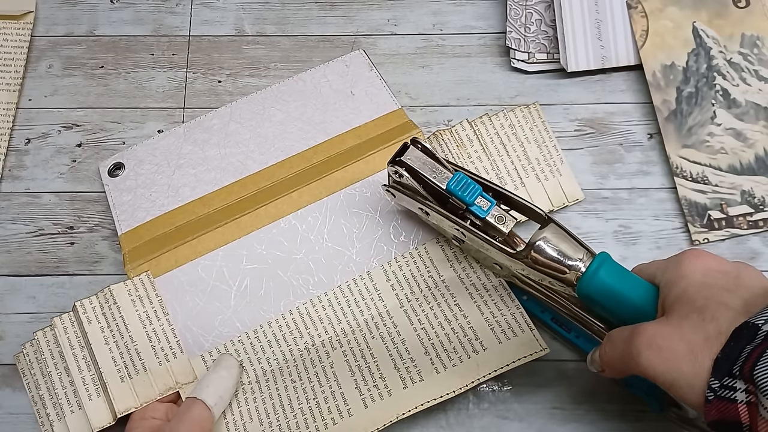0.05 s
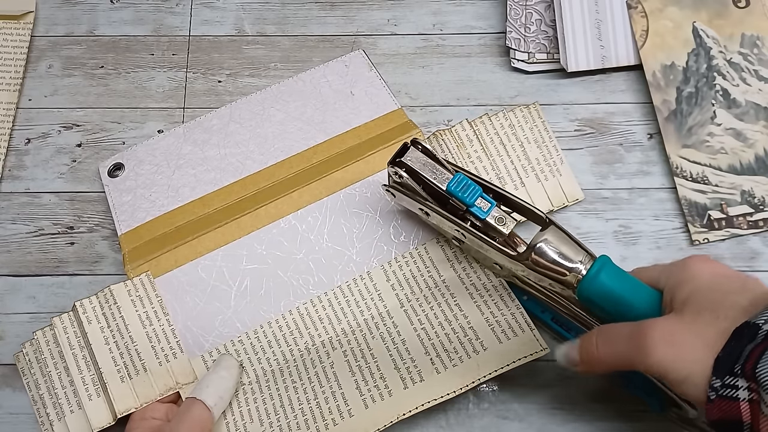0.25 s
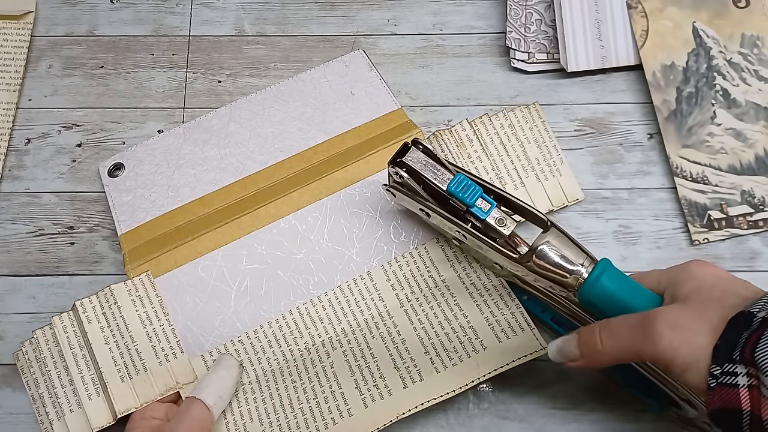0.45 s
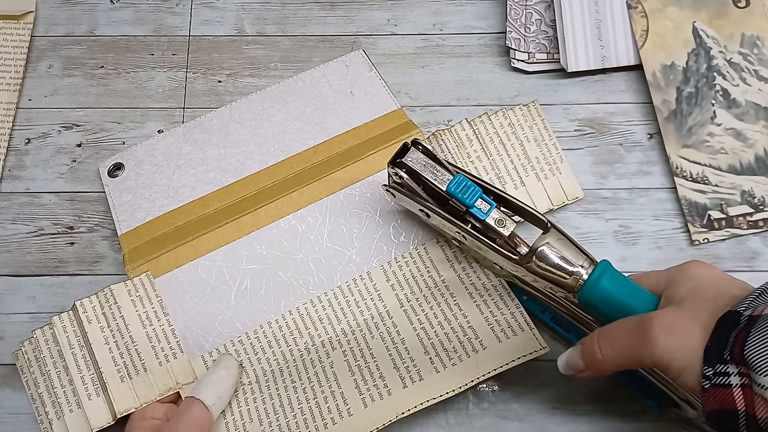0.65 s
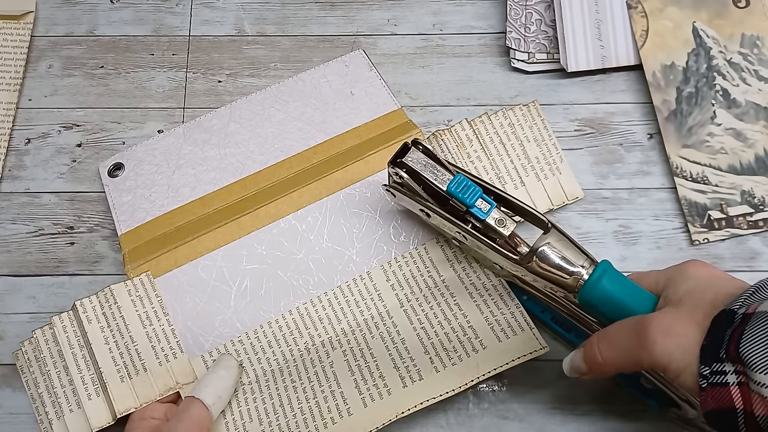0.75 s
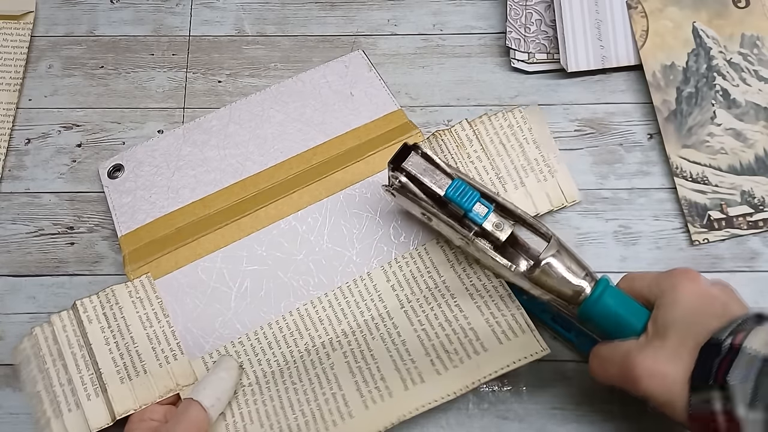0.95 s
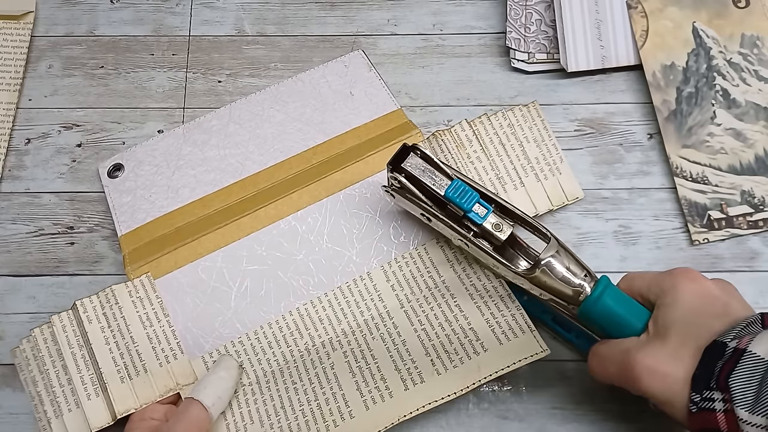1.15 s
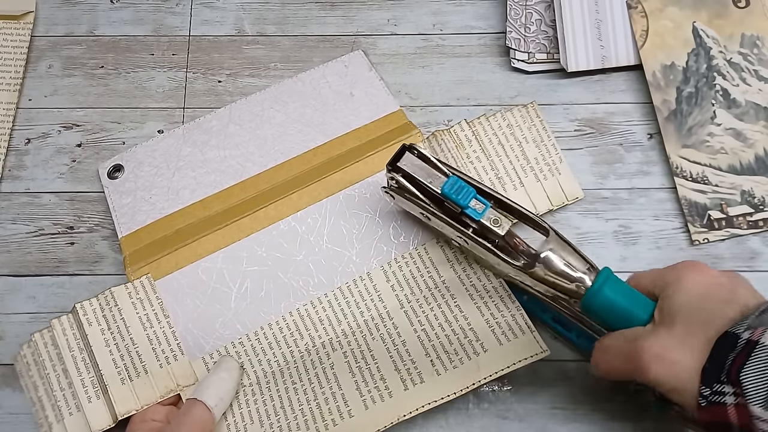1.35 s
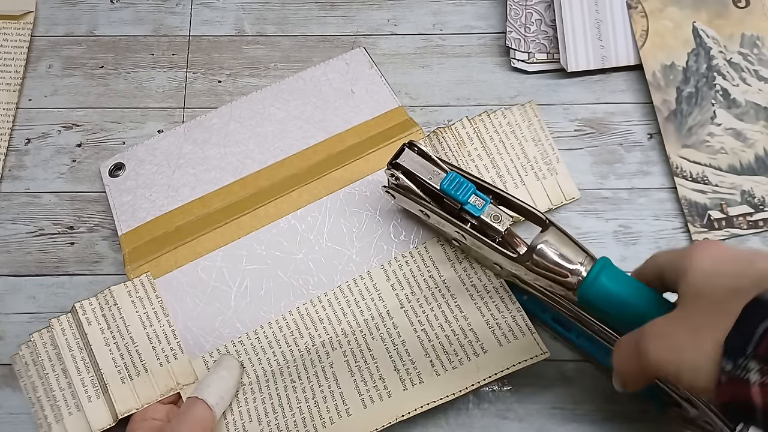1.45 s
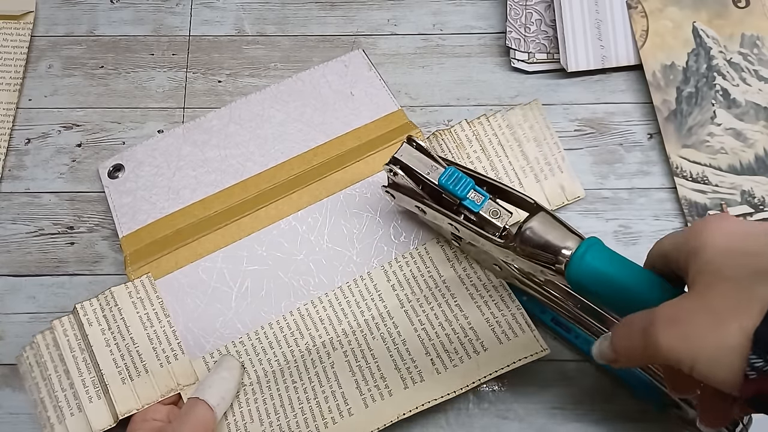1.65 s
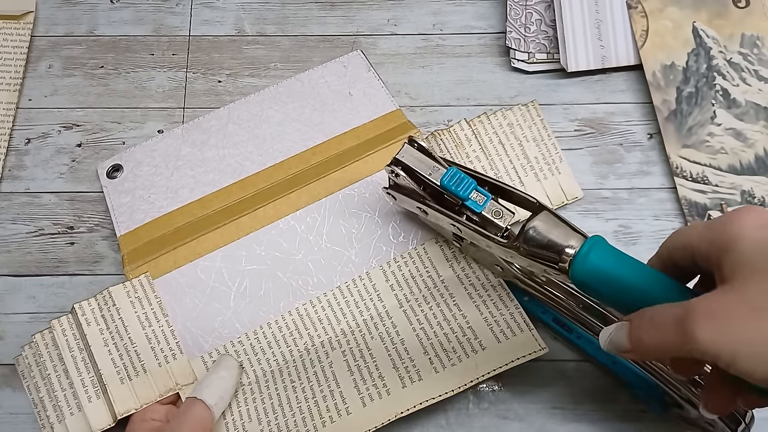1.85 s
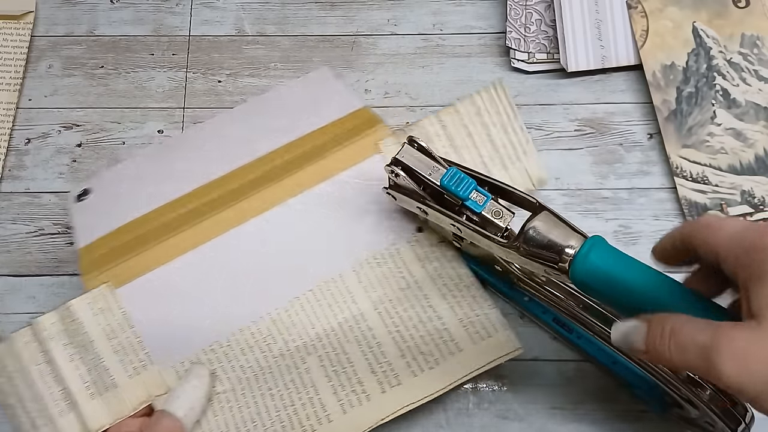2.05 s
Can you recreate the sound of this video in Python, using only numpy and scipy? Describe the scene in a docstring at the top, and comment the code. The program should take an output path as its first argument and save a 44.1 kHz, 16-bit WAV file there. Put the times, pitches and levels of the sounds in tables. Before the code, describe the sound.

Close up in a small quiet room, a hand punch creaks through stiff card in three pushes, snaps hard against the desk, then its lever scrapes and clacks back, with a few last knocks and a slide.

```python
"""A steel hand punch is squeezed through a card cover, close to the microphones, over a desk in a small room.
The hand rubs on the grips and the card creaks by stick-slip in three pushes, the last ever faster.
The pin snaps through, thumping the modes of desk and frame; the desk shudders and the spring sings on.
The pin scrapes back out as band noise, the lever clacks and squeaks at a gliding pitch with its partials,
and after some last knocks the punch slides off the card; a diffuse room tail and faint air noise lie under all."""
import sys
import numpy as np
from scipy import signal
from scipy.fft import rfft, irfft
from scipy.io import wavfile
from scipy.ndimage import uniform_filter1d

SR = 44100
rng = np.random.default_rng(int(sys.argv[2]) if len(sys.argv) > 2 else 0)


def waveform_to_disk(signal):
    """Save audio, clipped to [-1, 1], as 16-bit WAV at the path in sys.argv[1]."""
    frames = np.transpose(np.atleast_2d(signal))
    scaled = np.clip(frames, -1, 1) * 32767
    samples = np.round(scaled).astype(np.int16)
    wavfile.write(sys.argv[1], SR, samples)


N = 92521

# stereo width of noise, side minus mid: (frequency [Hz], level [dB])
WIDTH = [(60, -8.5), (300, -13.5), (700, -4.5), (1400, 2), (16000, -1)]


def amp(db):
    """Level law: 20 dB is a factor of ten in amplitude."""
    return 10 ** (np.asarray(db) / 20)


def seconds():
    """Sampled time axis of the scene [s]."""
    return np.arange(N) / SR


def decay(t, t60):
    """Exponential decay law: the level falls 60 dB in t60 seconds."""
    return np.exp(-np.log(1000) * t / t60)


def level_curve(points):
    """Amplitude over time, linear in level between (time [s], level [dB]) points."""
    when, db = np.array(points).T
    return amp(np.interp(seconds(), when, db))


def gains(points, size=N):
    """Frequency response: gain of each bin from (frequency [Hz], level [dB]) points on a log axis."""
    hz, db = np.array(points, float).T
    bins_hz = np.arange(size // 2 + 1) * SR / size
    return amp(np.interp(np.log(bins_hz + 1), np.log(hz), db))


def colour(x, points):
    """Linear filtering: multiply the spectrum by a frequency response."""
    return irfft(rfft(x) * gains(points), N)


def noise(points):
    """Random noise of a given spectrum and rms 1, its stereo width set by the mid and side balance."""
    mid, side = rng.standard_normal((2, N))
    side = colour(side, WIDTH)
    x = colour([mid + side, mid - side], points)
    return x / x.std()


def unit(h):
    """Energy normalisation: a response gets the energy of 10 ms at rms 1."""
    energy = np.mean(np.sum(h ** 2, axis=-1))
    return h / np.sqrt(energy / (SR / 100))


def through(x, h):
    """Convolution: every input sample sets off a copy of the response."""
    return signal.fftconvolve(np.atleast_2d(x), np.atleast_2d(h), axes=-1)[:, :N]


def ring(modes):
    """Modal superposition: damped modes swell within a cycle, with more phase between sides in higher ones."""
    t, out = seconds()[:SR], 0
    for k, (hz, db, t60) in enumerate(modes):
        sign = (-1) ** k
        skew = sign * min(hz / 3000, .9) * np.array([[1], [-1]])
        swell = 1 - np.exp(-2 * t * hz)
        out = out + sign * amp(db) * swell * decay(t, t60) * np.cos(2 * np.pi * hz * t + skew)
    return unit(out)


def burst(points, fade):
    """High modal density: many modes merge into fading stereo noise, evened out to the given colour."""
    size = len(fade)
    parts = rfft(rng.standard_normal((2, size)) * fade)
    even_bins = int(250 * size / SR)  # power averaged over 250 Hz
    power = uniform_filter1d(np.abs(parts) ** 2, even_bins, axis=-1)
    mid, side = parts / np.sqrt(power) * gains(points, size=size)
    side = side * gains(WIDTH, size=size)
    first_half = np.arange(size) < size / 2
    return unit(irfft([mid + side, mid - side], size) * first_half)


def grain(rate, depth_db):
    """Random modulation: level drawn anew rate times a second, as in the uneven grip of surfaces."""
    knots = np.arange(0, N / SR + 1, 1 / rate)
    return amp(depth_db * np.interp(seconds(), knots, rng.standard_normal(len(knots))))


def stick_slip(push):
    """Stick-slip: a train of impulses at the rate of the push, with jitter, scatter and changing treble."""
    jitter, scatter_db, treble_hz = .04, 2.5, 2400
    when, rate, db, treble = np.array(push).T
    slips, at = np.zeros(N), when[0]
    taps = np.arange(-8, 9)
    for late, size in rng.standard_normal((200, 2)):
        if at > when[-1]:
            break
        # windowed sinc places the slip between samples
        pulse = np.sinc(taps - at * SR % 1) * np.hanning(len(taps))
        slips[int(at * SR) + taps] += amp(np.interp(at, when, db) + scatter_db * size) * pulse
        at += np.exp(jitter * late) / np.interp(at, when, rate)
    low = signal.sosfiltfilt(signal.butter(2, treble_hz, fs=SR, output="sos"), slips)
    return low + (slips - low) * amp(np.interp(seconds(), when, treble))


def creak():
    """Stick-slip excitation of a resonator: each slip of the three pushes briefly rings the card."""
    # slips of the squeezed card: (time [s], slip rate [1/s], level [dB], treble gain [dB])
    first_push = [(.343, 70.4, -55, -51.5), (.353, 77.6, -50, -17.5), (.378, 113, -50.5, -19),
                  (.405, 131, -44, -18), (.443, 175, -48.5, -10), (.455, 100, -42, -9),
                  (.466, 70, -40.5, -7), (.485, 60, -43.5, -8)]
    middle_push = [(.498, 87.9, -44, -6.5), (.525, 91.2, -44.5, -2), (0.559, 102.1, -40, 6.5),
                   (0.589, 85.8, -42.5, -1.5)]
    last_push = [(.614, 70.4, -42, 4.5), (0.659, 89.4, -42.5, 0), (0.693, 113.2, -38.5, 3.5),
                 (0.726, 177.5, -38.5, 6), (0.746, 246.8, -37, 0), (0.764, 405.7, -38, 6.5),
                 (0.777, 558, -45.5, 11.5), (.79, 853, -37.5, 1.5)]
    # spectrum of the card's ring: (frequency [Hz], level [dB])
    card = [(60, -28.5), (130, -16.5), (235, 9.5), (330, -6.5), (420, 11.5), (600, -11), (830, 3),
            (1100, -12.5), (1450, -7), (1900, -23.5), (2700, -17.5), (3400, -37.5), (6300, -27),
            (7700, -29.5), (9300, -26), (12000, -34.5), (16000, -52)]
    ring_s, tail_s, tail_db = 0.0071, 0.0085, -14.5
    t = seconds()[:SR // 2]
    slips = sum(stick_slip(push) for push in (first_push, middle_push, last_push))
    fade = np.exp(-t / ring_s) + amp(tail_db) * np.exp(-t / tail_s)
    return through(slips, burst(card, fade))


def blows():
    """Impact excitation: each blow rings desk, frame and pin, with a dull clack and a bright tick of contact."""
    # blows: (time [s], desk [dB], frame [dB], clack [dB], tick [dB], pin [dB], left minus right [dB])
    blow_table = [(.789, -21, -54, -32.5, -55, -63, -3), (.801, -62, -49, -63, -34, -51.5, -3),
                  (.8172, -10.5, -40, -23.5, -22, -41.5, 2.5), (.8205, -17.5, -30, -18, -17.5, -51.5, -1),
                  (.8275, -14.5, -38, -36.5, -27.5, -34.5, -3), (.8352, -14.5, -30.5, -34, -24.5, -51.5, 0),
                  (1.268, -55, -59, -43, -67, -76.5, -5), (1.2858, -45.5, -38, -33, -29, -38, 0.5),
                  (1.308, -53, -61, -31.5, -54, -62.5, -10.5), (1.3162, -41, -22, -34.5, -21, -23.5, -1),
                  (1.342, -38.5, -44, -30.5, -28.5, -56, -1.5), (1.351, -42, -37, -67, -37.5, -48, 2.5),
                  (1.363, -69, -50, -36.5, -49, -50, -1.5), (1.5598, -45, -59.5, -40.5, -22.5, -49, 1),
                  (1.570, -56, -32.5, -38, -58.5, -72, 0.5), (1.5825, -44, -40, -40.5, -61, -59.5, -3),
                  (1.623, -51.5, -45.5, -59, -70, -71, -0.5), (1.640, -68, -66, -65.5, -82, -84, 0),
                  (1.7722, -28, -29, -25, -52, -68, -0.5), (1.7775, -35.5, -36, -39, -68, -71, 5.5),
                  (2.068, -70.5, -28.5, -54, -52.5, -65, -0.5)]
    # modes of each body: (frequency [Hz], level [dB], t60 [s])
    desk_modes = [(86, -15.5, 0.067), (124.9, 1.5, .16), (171.1, -16.5, 0.027), (227.5, 5.5, 0.066),
                  (316, -1, 0.058), (345, -1, 0.069), (424, 1, 0.082), (526, -16.5, 0.12)]
    frame_modes = [(434.1, -18.5, 0.27), (721, 0.5, .06), (816.5, -2.5, 0.07), (990, 3, 0.01),
                   (1383, -7.5, 0.037), (1610, -10, 0.018)]
    pin_modes = [(2843, -11, .08), (2890, -8, 0.08), (6360, -18, .06), (6750, -2, 0.023),
                 (10950, -0.5, 0.053), (13030, -7.5, .05)]
    # spectra of the contact noise: (frequency [Hz], level [dB])
    clack_colour = [(30, -34), (90, -13.5), (200, 0.5), (420, 11.5), (560, 0), (850, 4.5), (1300, -5.5),
                    (2000, -7.5), (2850, -5.5), (3800, -15), (7000, -17.5), (16000, -38)]
    tick_colour = [(500, -23), (2000, -11.5), (2900, -13.5), (4200, -4), (6800, 4), (8800, -4), (11000, 1),
                   (15500, 1.5)]
    clack_s, tick_s = 0.0075, 0.0036  # decay time constants of the contact noise
    buzz_s, buzz_db = 0.012, -21  # loose parts buzz on as a slower noise tail
    t, out = seconds()[:SR // 2], np.zeros((2, N + SR))
    desk, frame, pin = (ring(modes)[:, :len(t)] for modes in (desk_modes, frame_modes, pin_modes))
    buzz = amp(buzz_db) * np.exp(-t / buzz_s)
    for at, desk_db, frame_db, clack_db, tick_db, pin_db, pan_db in blow_table:
        clack = burst(clack_colour, np.exp(-t / clack_s) + buzz)
        tick = burst(tick_colour, np.exp(-t / tick_s) + buzz)
        hit = amp(desk_db) * desk + amp(frame_db) * frame + amp(pin_db) * pin
        hit = hit + amp(clack_db) * clack + amp(tick_db) * tick
        i = int(at * SR)
        out[:, i:i + len(t)] += hit * amp([[pan_db / 2], [-pan_db / 2]])
    return out[:, :N]


def squeak():
    """Periodic stick-slip of steel on steel: harmonic partials on a gliding, slightly unsteady pitch."""
    # the returning lever: (time [s], pitch [Hz], level [dB])
    glide = [(1.389, 380.4, -64), (1.421, 398.8, -53), (1.434, 429.5, -36), (1.451, 408.4, -37),
             (1.478, 408, -50.5), (1.50, 395, -70.5), (1.53, 410, -110)]
    # harmonics: (multiple of the pitch [-], level [dB])
    partials = [(1, 0), (2, -18), (3, -14), (4, -24), (6, -9), (7, -19), (9, -19), (12, -18), (15, -12),
                (18, -18)]
    t, (when, hz, db) = seconds(), np.array(glide).T
    pitch = np.interp(t, when, hz) * grain(rate=330, depth_db=-0.1)
    phase = 2 * np.pi * np.cumsum(pitch) / SR
    sides = np.array([[1], [-1]])
    tone = sum(amp(level) * np.sin(k * phase + sides * min(k / 6, .7)) for k, level in partials)
    return tone * amp(np.interp(t, when, db)) * (t > when[0]) * (t < when[-1])


def pin_scrapes():
    """Sliding friction: the pin rubs in the hole as grainy noise."""
    # scrapes: (time [s], length [s], level [dB])
    scrapes = [(0.79, 0.041, -41), (1.202, 0.028, -39), (1.246, 0.057, -56.5), (1.313, 0.036, -36),
               (1.36, 0.12, -50.5), (1.47, 0.089, -63.5)]
    # spectrum: (frequency [Hz], level [dB])
    scrape_colour = [(200, -16), (850, 2), (1700, -3.5), (2800, 4), (4200, -5), (6500, 5), (9000, -6),
                     (13000, -1.5), (16000, -8)]
    attack_s, release_s = 0.015, .007
    t, rub = seconds(), 0
    for at, length, db in scrapes:
        attack = np.clip((t - at) / attack_s, 0, 1)
        release = np.exp(-np.maximum(t - at - length, 0) / release_s)
        rub = rub + amp(db) * attack * release
    return rub * noise(scrape_colour) * grain(rate=1300, depth_db=1.5)


def sliding():
    """Sliding friction: the punch moves over the card as grainy noise."""
    # level of the slide: (time [s], level [dB])
    slide_level = [(1.975, -86), (2.0, -61), (2.03, -55.5), (2.056, -40.5), (2.08, -46.5), (2.1, -39)]
    # spectrum: (frequency [Hz], level [dB])
    slide_colour = [(60, -17.5), (300, -15), (520, -13.5), (740, 4.5), (1100, -14), (1550, -5), (2200, -19),
                    (4500, -20.5), (8000, -25), (16000, -30)]
    return level_curve(slide_level) * noise(slide_colour) * grain(rate=750, depth_db=2.0)


def hand_grip():
    """Skin friction: the hand on the grips gives dull noise with a slow, uneven level."""
    # level of the grip: (time [s], level [dB])
    grip_level = [(0, -81), (.05, -87), (.07, -69.5), (.13, -66), (.2, -61), (.25, -64.5), (.29, -74),
                  (.35, -64.5), (.9, -57.5), (1.0, -66.5), (1.08, -93.5), (1.2, -79), (1.25, -52),
                  (1.5, -62.5), (1.62, -54), (1.7, -82.5), (1.97, -78.5), (2.1, -80)]
    # spectrum: (frequency [Hz], level [dB])
    hand_colour = [(30, -8.5), (130, 6), (250, 3), (430, 0), (600, -15.5), (820, -9), (1500, -31),
                   (4000, -39), (16000, -37.5)]
    return level_curve(grip_level) * noise(hand_colour) * grain(rate=30, depth_db=5)


def tinks():
    """Narrow-band resonance: each light touch in the linkage rings in one band and fades exponentially; the
    loud band at 1.772 s adds to the frame's ring near 430 Hz under the clack."""
    # touches, and the clack's frame ring at 1.772 s: (time [s], centre frequency [Hz], level [dB])
    touches = [(0.198, 423, -62), (0.312, 685, -66), (1.284, 2700, -31.5), (1.719, 1087, -66.5),
               (1.772, 433, -26.5), (1.902, 3255, -60.5), (1.947, 3096, -65.5)]
    fade_s = 0.016
    t, out = seconds(), 0
    for at, hz, db in touches:
        band = noise([(hz / 2, -35), (hz / 1.12, -12), (hz, 0), (hz * 1.13, -10), (hz * 2, -20), (hz * 4, -40)])
        out = out + amp(db) * band * (t > at) * np.exp(-np.abs(t - at) / fade_s)
    return out


def spring():
    """Lightly damped oscillator: the snap sets the spring singing until the lever moves again."""
    start, stop = .82, 1.23  # s
    hz, t60 = 893.6, 1.8
    t = seconds()
    free = np.clip(np.minimum(t - start, stop - t) / .01, 0, 1)  # 10 ms fades
    tone = free * decay(t - start, t60) * np.sin(2 * np.pi * hz * t)
    return amp(-61) * tone * amp([[-7], [5]])  # weaker on the left


def shudder():
    """Low-frequency structural vibration: the desk rumbles under the snap."""
    # level of the rumble: (time [s], level [dB])
    rumble_level = [(.78, -79), (.83, -35), (.895, -33), (.96, -55), (1.01, -56.5), (1.08, -82),
                    (1.2, -100)]
    # spectrum: (frequency [Hz], level [dB])
    rumble_colour = [(20, -16), (45, -0.5), (85, 0.5), (110, -11), (170, -13), (400, -25), (700, -53.5),
                     (4000, -82.5)]
    return level_curve(rumble_level) * noise(rumble_colour)


def room(dry):
    """Diffuse reverberation: convolution with exponentially decaying noise that enters after a short delay."""
    # spectrum of the tail: (frequency [Hz], level [dB])
    room_colour = [(40, -1.5), (150, 3.5), (500, 2), (2500, 1.5), (7000, -3), (16000, -4)]
    level_db, t60, delay_s = -14.5, 0.21, .007
    t = seconds()
    onset = np.clip(t / delay_s - 1, 0, 1)
    tail = noise(room_colour) * onset * decay(t, t60)
    tail = tail / np.sqrt(np.sum(tail ** 2) / 2)  # mean energy 1 per side
    return amp(level_db) * through(dry, tail)


def air():
    """Stationary random noise: the faint, steady air of the background."""
    # spectrum: (frequency [Hz], level [dB])
    air_colour = [(25, -13), (80, -1.5), (250, -17), (700, -23.5), (1200, -26), (16000, -33)]
    return amp(-79.5) * noise(air_colour)


def scene():
    """Superposition: the sources add; all but the spring also excite the room."""
    dry = creak() + blows() + squeak() + pin_scrapes() + sliding() + hand_grip() + tinks() + shudder()
    return dry + spring() + room(dry) + air()


def record(dry):
    """Band limiting: two microphones differ a little in colour; the recorder cuts deepest bass and top."""
    # left minus right: (frequency [Hz], level [dB])
    balance = [(100, 1), (800, -1), (2000, 2.1), (5000, -1.5), (14000, 4.2)]
    low_cut_hz, top_hz = 32, 16000
    x = irfft(rfft(dry) * gains(balance) ** np.array([[.5], [-.5]]), N)
    x = signal.sosfilt(signal.butter(2, low_cut_hz, "high", fs=SR, output="sos"), x)
    return signal.sosfilt(signal.ellip(8, .2, 70, top_hz, fs=SR, output="sos"), x)


dry = scene()
out = record(dry)
waveform_to_disk(out)
```